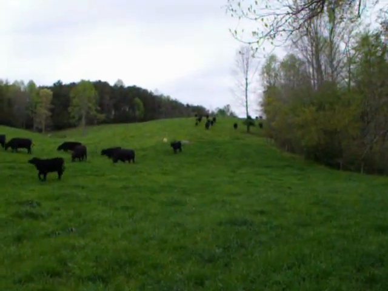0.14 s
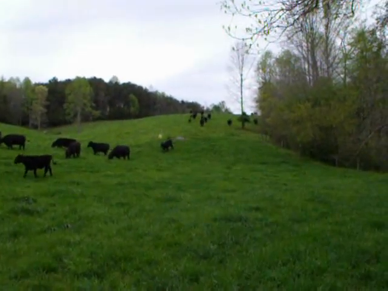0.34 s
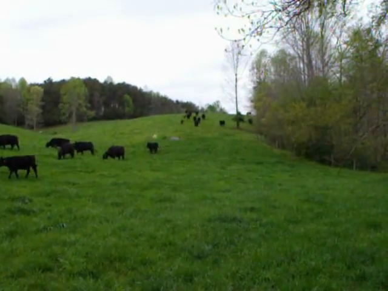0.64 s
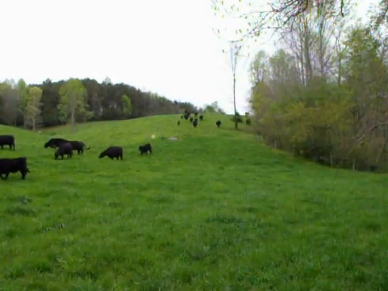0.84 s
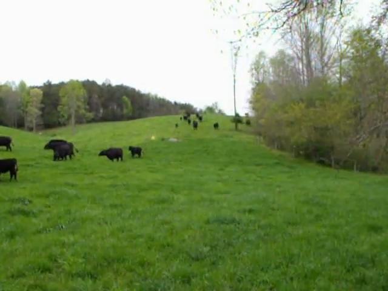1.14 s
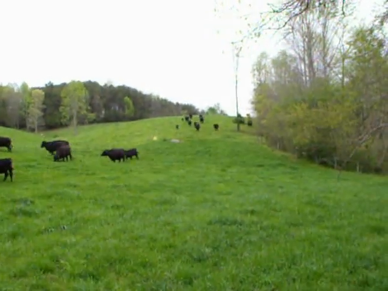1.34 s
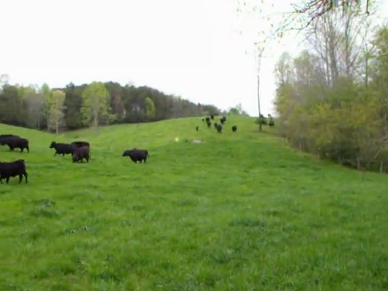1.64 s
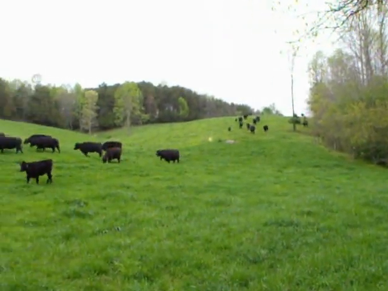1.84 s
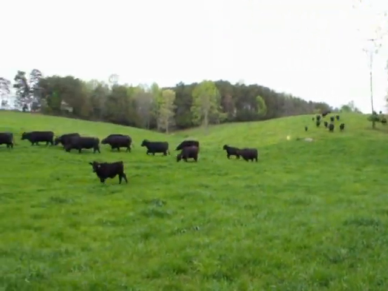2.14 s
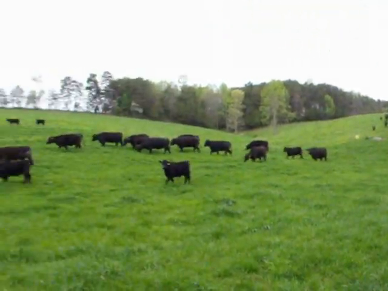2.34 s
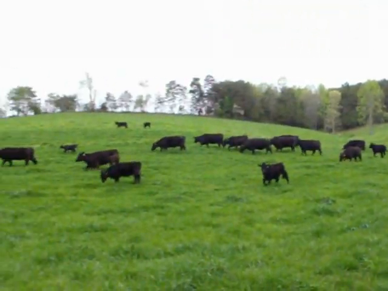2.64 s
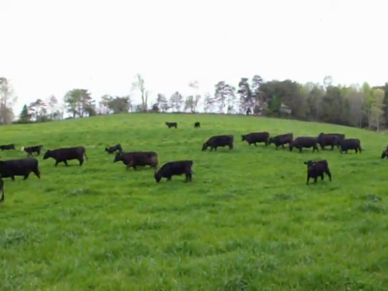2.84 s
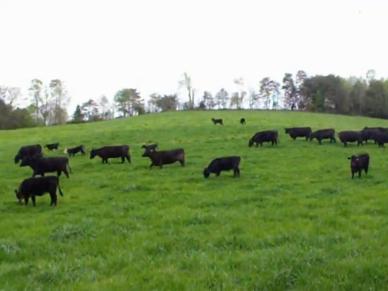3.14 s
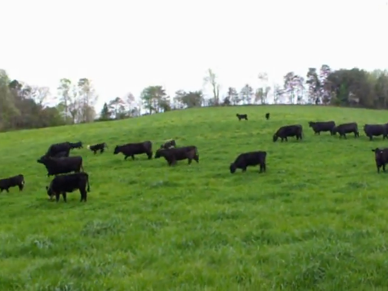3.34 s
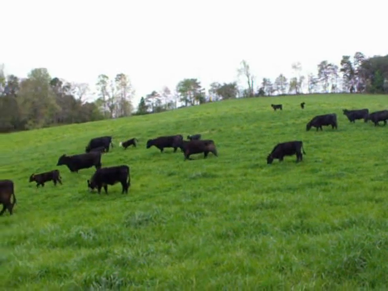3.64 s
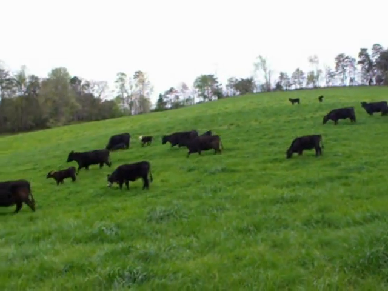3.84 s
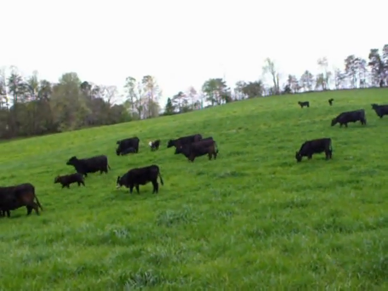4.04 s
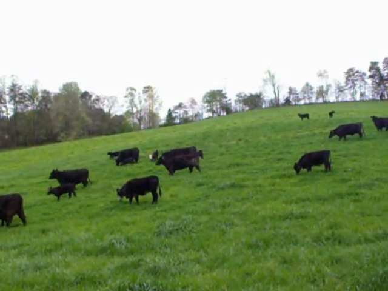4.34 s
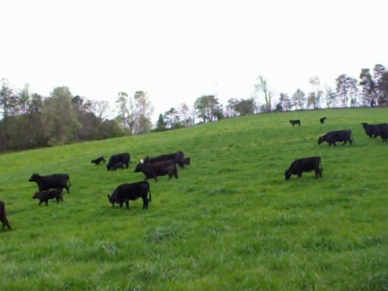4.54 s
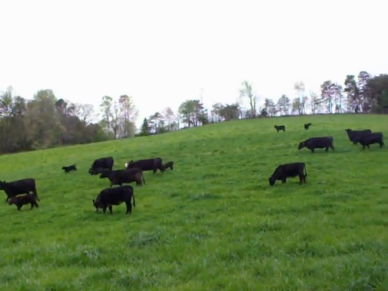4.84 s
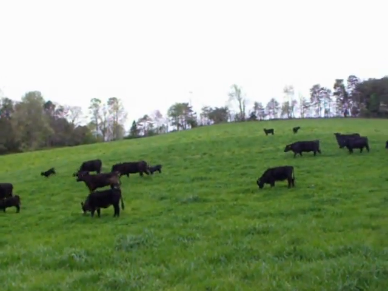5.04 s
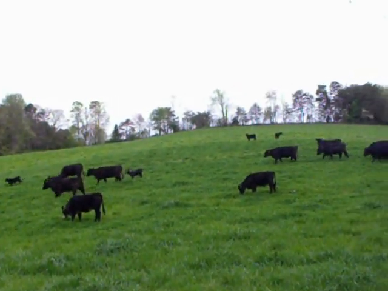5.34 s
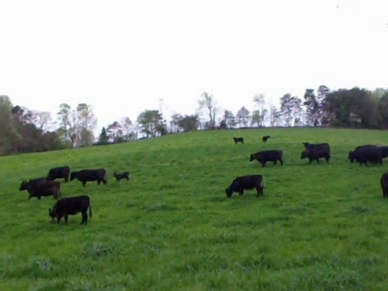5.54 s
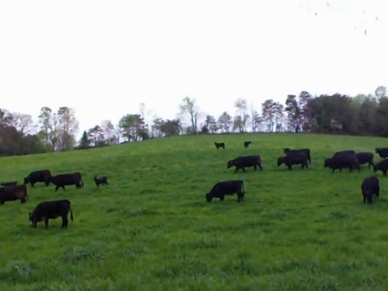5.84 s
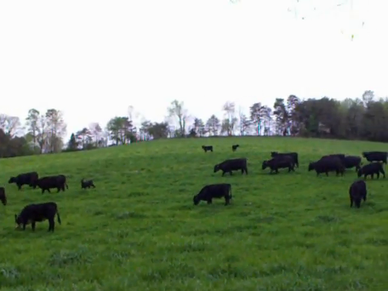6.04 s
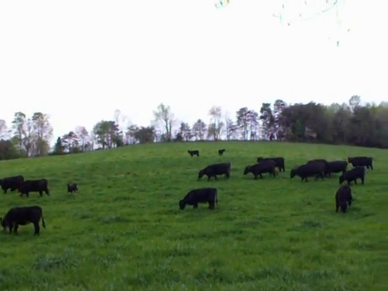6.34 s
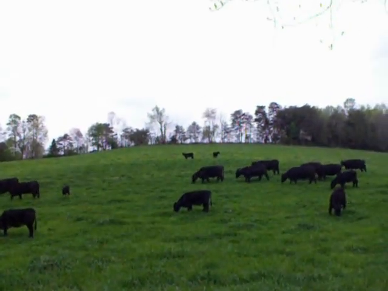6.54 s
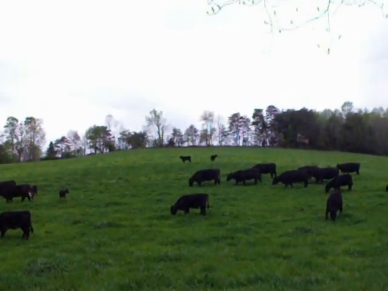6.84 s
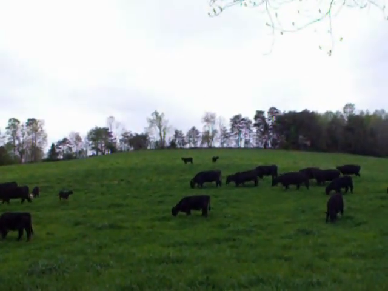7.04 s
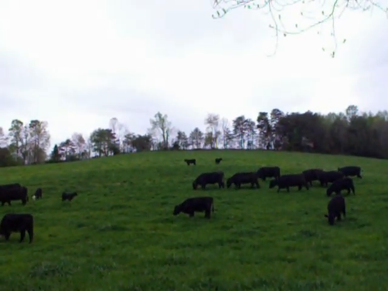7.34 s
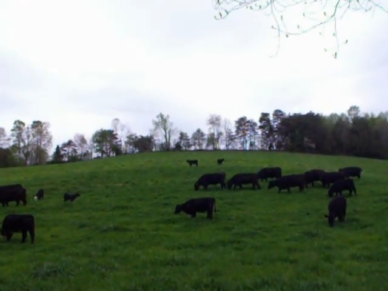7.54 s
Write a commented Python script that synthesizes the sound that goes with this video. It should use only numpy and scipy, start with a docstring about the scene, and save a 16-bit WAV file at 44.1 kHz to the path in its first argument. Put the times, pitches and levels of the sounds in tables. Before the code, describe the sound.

A nearby cow gives short, brassy, wavering moos and another answers with longer rising calls, over wind in the grass.

```python
"""Cattle calling across a pasture

A near cow gives four short brassy moos; a second answers with two long rising calls and ends the
first in a hoarse rasp. Others call far away, two of them very deep. Each voice is a train of
vocal-fold snaps ringing a throat and mouth that change shape. Wind hisses in the grass and trees,
and a hand-held camera ticks, whines and buzzes faintly."""
import sys
import numpy as np
from scipy import signal
from scipy.fft import rfft, irfft, next_fast_len
from scipy.io import wavfile
from scipy.ndimage import map_coordinates

SR = 44100
rng = np.random.default_rng(int(sys.argv[2]) if len(sys.argv) > 2 else 0)


def output_pcm(signal):
    """Save a mono or channel-first signal as 16-bit PCM at the path in sys.argv[1].

    Samples are clipped to [-1, 1] before scaling.
    """
    pcm = np.clip(np.atleast_2d(signal).T, -1, 1) * 32767
    wavfile.write(sys.argv[1], SR, np.round(pcm).astype(np.int16))


N = 339129
TIME = np.arange(N) / SR
CLEAR, HUSKY = .15, .23  # voice roughness: breath and timing jitter

# Wavering moos, four near and one answering: start_s, length_s, attack_s, release_s, level_db, pitch_hz,
# climb_hz_per_s, scoop_hz, catch_s, waver_hz, waver_period_s, mouth_start_hz, mouth_end_hz, gape_hz
WAVERING_MOOS = [(1.478, 0.27, .13, .08, -19.5, 139.3, -8, 0, 1.575, 4, .165, 1350, 1370, 190),
                 (2.215, .455, 0.15, .07, -19.5, 132.7, 0, 10, 2.545, 4.5, .136, 1226, 1423, 170),
                 (3.268, .385, 0.088, .11, -18.5, 129.5, 11, 5, 3.489, 5, .22, 1360, 1580, 279.5),
                 (7.388, .5, 0.27, .06, -16.5, 135, 21, 11.5, 7.51, 1.1, .11, 1418, 1375, -6),
                 (3.25, .535, .2, .16, -26, 137.7, -3, 1, 3.515, 1.7, .16, 1250, 950, -2)]
# Plain lows, a nasal hum, a thin call and two deep ones:
# start_s, length_s, attack_s, release_s, level_db, start_hz, top_hz, end_hz
PLAIN_LOWS = [(2.83, .53, .44, .07, -30.5, 102, 136, 138), (5.68, .43, .1, .22, -38, 142.5, 141.5, 137),
              (3.07, .56, .22, 0.24, -43.5, 87, 101, 84), (5.47, 1.22, .44, .42, -45.5, 65, 84.8, 82)]


def amp(db):
    """Decibels to gain."""
    return 10 ** (np.asarray(db) / 20)


def unit(x):
    """x at rms 1."""
    return x / np.sqrt(np.mean(x ** 2) + 1e-20)


def along(points, hz):
    """Read (freq_hz, value) points on a log axis."""
    f, values = np.transpose(points)
    return np.interp(np.log(hz + 1), np.log(f + 1), values)


def curves(rows, t):
    """Each column after the time, read at the times t."""
    times, *columns = np.transpose(rows)
    return [np.interp(t, times, column) for column in columns]


def bump(t, centre_s, half_length_s):
    """A smooth rise and fall."""
    return np.exp(-((t - centre_s) / half_length_s) ** 2)


def wobble(rate):
    """A smooth random curve, rate knots a second."""
    return map_coordinates(rng.standard_normal(int(N * rate / SR) + 4), [TIME * rate])


def filtered(x, response):
    """x through a frequency response."""
    size = next_fast_len(len(x) + 8192)
    return irfft(rfft(x, size) * response(np.fft.rfftfreq(size, 1 / SR)), size)[:len(x)]


def noise(spectrum):
    """Coloured noise of rms 1."""
    return unit(filtered(rng.standard_normal(N), lambda f: amp(along(spectrum, f))))


def resonance(f, hz, width):
    """Response of one damped mode."""
    return 1j * f * width / (hz * hz - f * f + 1j * f * width)


def causal(gain_db, size):
    """Minimum-phase responses: each rings after its pulse, not before."""
    cepstrum = irfft(np.log(amp(gain_db)))
    cepstrum[:, 1:size // 2] *= 2
    cepstrum[:, size // 2 + 1:] = 0
    return np.exp(rfft(cepstrum))


def wind():
    """A bed of air and rumble, with leaves and grass that hiss in the gusts, then ease."""
    # Colour of the air and of the leaves: freq_hz, relative_db
    air_spectrum = [(12, -28.5), (20, 7), (22, 5), (210, 0), (351, -5), (935, -1.5), (1260, -3.5),
                    (1490, -2.5), (4950, -12), (6170, -17), (6970, -50.5), (9060, -75), (15300, -120)]
    leaf_spectrum = [(180, -29.5), (300, -10), (457, -7.5), (564, -8.5), (849, -5.5), (4820, -1.5),
                     (5950, -12), (6970, -37.5), (9060, -71.5), (15300, -120)]
    # Gusts in the leaves: centre_s, half_length_s, strength
    gusts = [(0.756, 0.055, 1.8), (1.28, 0.15, 1.6), (1.81, .05, 1.6), (2.13, 0.079, 2)]
    breeze_db = np.interp(TIME, [3.27, 6.77], [-36.06, -42.64])
    gust_db = 1.88 * sum(strength * bump(TIME, s, half_length) for s, half_length, strength in gusts)
    bed = noise(air_spectrum) * amp(-41 + 1.2 * wobble(5))
    leaves = noise(leaf_spectrum) * amp(breeze_db + gust_db + 2.07 * wobble(22))
    rumble = noise([(15, -1.5), (60, -15.5), (200, -22.5), (2000, -92)]) * amp(-59.5 + 1.7 * wobble(7.7))
    return bed + leaves + rumble


def handling_ticks():
    """Clicks and soft bumps of a hand on the camera body: a sharp kick, then a short rattle."""
    # Touches: start_s, relative_db, centre_hz, t60_s
    touches = [(0.434, -30.5, 650, .04), (2.6335, -21, 4000, .008), (2.676, -13.5, 2900, 0.02),
               (2.6875, -20.5, 3300, .008), (5.608, -26, 500, 0.26), (5.722, -27, 450, 0.14)]
    out, t = np.zeros(N), np.arange(SR // 10) / SR
    for start, db, hz, t60 in touches:
        rattle = rng.standard_normal(len(t)) * amp(-60 * t / t60)
        rattle[0] += 10  # the kick
        tick = filtered(rattle, lambda f: resonance(f, hz, 2 * hz) ** 2 / (1 + (f / 5500) ** 8))
        out[round(start * SR):][:len(t)] += tick * np.sqrt(SR / hz / 4) * amp(db - 3)
    return out


def tree_line_echo(x, t60_s=0.59):
    """The tree line sends back a dull, diffuse echo."""
    t = np.arange(SR) / SR
    scatter = rng.standard_normal(SR) * amp(-60 * t / t60_s) * (1 - np.exp(-t / 0.0068))
    tail = filtered(scatter, lambda f: 1 / (1 + (f / 2500) ** 2))
    return signal.fftconvolve(x, tail / np.linalg.norm(tail))[:N]


def envelope(start, length, attack, release):
    """Times of one call, the progress 0-1 of its attack and release, and its swell in dB."""
    t = np.linspace(start, start + length, num=200)
    rise = np.clip((t - start) / attack, 0, 1)
    fall = np.clip(1 - (t[-1] - t) / release, 0, 1)
    swell = np.sin(np.pi / 2 * rise) * np.cos(np.pi / 2 * fall)
    return t, rise, fall, 20 * np.log10(np.maximum(swell, .03))


def lowing(start, length, attack, release, db, from_hz, top_hz, to_hz, mouth_hz=1364):
    """Course of a plain low: the mouth stays nearly shut, the pitch glides as it swells and fades."""
    t, rise, fall, swell_db = envelope(start, length, attack, release)
    glide_in = (from_hz - top_hz) * np.cos(np.pi / 2 * rise) ** 2
    glide_out = (to_hz - top_hz) * np.sin(np.pi / 2 * fall) ** 2
    return np.column_stack([t, top_hz + glide_in + glide_out, db + swell_db, np.full_like(t, mouth_hz)])


def wavering(start, length, attack, release, db, hz, climb, scoop_hz, catch, waver_hz, period,
             mouth_from_hz, mouth_to_hz, gape_hz):
    """Course of a moo: it scoops up, wavers around a catch, then drops as the air runs out."""
    scoop_s, drop_hz, push_db_per_hz = .09, 24.96, .41  # a higher pitch is a harder push
    t, _, fall, swell_db = envelope(start, length, attack, release)
    age = t - start
    waver = -waver_hz * np.cos(2 * np.pi * (t - catch) / period) * bump(t, catch, 1.3 * period)
    pitch = hz + climb * age - scoop_hz * np.exp(-age / scoop_s) + waver - drop_hz * fall ** 2
    gape = gape_hz * bump(t, catch - .016, .034)  # the mouth gapes just before the catch
    mouth = mouth_from_hz + (mouth_to_hz - mouth_from_hz) * age / length + gape
    return np.column_stack([t, pitch, db + swell_db + push_db_per_hz * waver, mouth])


def moo(course, throat, rough, mouth_db=0, mouth_width_hz=200, jaw_db=0, bright_db=0, effort=0.48,
        open_db=0, stretch=0, size=2048):
    """Each snap of the vocal folds, with its puff of air, rings the throat as it is shaped just then."""
    start, end = course[0][0], course[-1][0]
    t = TIME[(TIME >= start) & (TIME <= end)]
    cycles = np.cumsum(curves(course, t)[0]) / SR
    snaps = np.interp(np.arange(int(cycles[-1]) + 1), cycles, t)
    # the folds lose their regular beat as the call runs out
    ends_in_scene = end < TIME[-1] - .05
    loose = rough * (1 + 2.8 * np.exp((snaps - end) / .04) * ends_in_scene)
    snaps = snaps + 4e-5 * loose * rng.standard_normal(len(snaps))
    pitch, db, mouth_hz = [curve[:, None] for curve in curves(course, snaps)]
    f, age = np.fft.rfftfreq(size, 1 / SR), np.arange(size) / SR
    # a dropping jaw raises the mouth resonance, shifts the others and brings out a second one above it
    opening = np.clip((mouth_hz - 1300) / 100, 0, 1)
    shape_db = along(throat, f / (1 + stretch * opening))
    shape_db += mouth_db * abs(resonance(f, mouth_hz, mouth_width_hz))
    shape_db += jaw_db * opening * abs(resonance(f, 1748, 220)) ** 2
    # a harder push and a wider mouth both let out more treble
    treble_db = bright_db + effort * (db - db.max()) + open_db * np.log2(mouth_hz / np.median(mouth_hz))
    shape_db += treble_db * np.clip(f / 1500 - 1, 0, 1)
    # tongue and lips never hold still, so the colour drifts
    drift_grid = np.broadcast_arrays((snaps[:, None] - start) * 12 + 1, f / 450)
    shape_db += 1.8 * map_coordinates(rng.standard_normal((24, 64)), drift_grid, mode="nearest")
    puff = rng.standard_normal((len(snaps), size)) * np.exp(-age * pitch)
    breath = rfft(puff / np.linalg.norm(puff, axis=1, keepdims=True)) * (.7 + f / 6000)
    excitation = loose[:, None] * breath - 1  # the -1 is the snap
    onset, fraction = np.divmod(snaps[:, None] * SR, 1)
    subsample_delay = np.exp(-2j * np.pi * f * fraction / SR)
    pulses = irfft(causal(shape_db, size) * excitation * subsample_delay)
    pulses *= np.sqrt(SR / pitch) / np.linalg.norm(pulses, axis=1, keepdims=True)
    pulses *= amp(db + .5 * rng.standard_normal(db.shape))
    return np.bincount((onset.astype(int) + np.arange(size)).ravel(), pulses.ravel(), N)[:N]


def far_cows():
    """A thin distant low and two very deep ones."""
    # Throat colours: freq_hz, relative_db
    thin_throat = [(140, -25), (430, -6), (700, -13), (1100, -3), (1700, 3.5), (2200, -11), (4000, -47)]
    deep_throat = [(85, 1), (170, -6), (260, -17), (1000, -34), (3000, -52.5)]
    thin, deep, deeper = [lowing(*row) for row in PLAIN_LOWS[1:]]
    return moo(thin, thin_throat, CLEAR) + moo(deep, deep_throat, HUSKY) + moo(deeper, deep_throat, CLEAR)


def rasp():
    """The answering cow's slack folds flutter in rushing air, which whistles just before it stops."""
    # Throat resonances: centre_hz, width_hz, relative_db
    modes = [(1015, 190, -2.5), (1424, 170, -9), (2040, 380, -6), (2900, 380, -5.5), (4460, 1300, -12.5)]
    # Pushes of air: centre_s, half_length_s, level_db
    pushes = [(3.66, 0.063, -31.5), (3.795, 0.042, -29.5), (3.902, 0.035, -21.5)]
    # Whistles: start_s, length_s, start_hz, end_hz, level_db
    whistles = [(3.908, 0.023, 767, 860, -25), (3.915, 0.027, 1880, 2080, -19.5)]
    air = rng.standard_normal(N)
    air = filtered(air, lambda f: sum(amp(db) * resonance(f, hz, width) for hz, width, db in modes))
    air = filtered(air, lambda f: 1 / (1 + (f / 4500) ** 6))
    push = sum(amp(db) * bump(TIME, s, half_length) for s, half_length, db in pushes)
    flutter = amp(1.7 * wobble(260))
    out = unit(air * flutter) * push
    for start, length, from_hz, to_hz, db in whistles:
        progress = np.clip((TIME - start) / length, 0, 1)
        hz = (from_hz + (to_hz - from_hz) * progress) * (1 + 0.021 * wobble(400))
        swell = amp(db) * np.sqrt(2) * np.sin(np.pi * progress) ** 2
        out += swell * np.sin(2 * np.pi * np.cumsum(hz) / SR)
    return out


def answering_cow():
    """A nasal hum opens into a moo; then a long moo rises and swells as its mouth resonance sinks."""
    # Throat colours, humming and open: freq_hz, relative_db
    hum_throat = [(110, -12), (220, -1), (350, -16), (900, -11), (1400, -4), (2100, -16), (2620, 1),
                  (3000, -18), (3900, -14), (4220, 5), (4550, -13), (6000, -22)]
    open_throat = [(130, -6), (330, -9.5), (430, 0), (580, -14), (850, -9), (1150, 0), (1420, -7),
                   (1650, 7), (1950, -12), (2220, 5.5), (2500, -12.5), (2750, 4), (3200, -17.5),
                   (4400, -7.5), (6000, -29)]
    # Course of the long moo: time_s, pitch_hz, level_db, mouth_hz
    long_moo = [(4.88, 106.4, -40.5, 1230), (5.01, 121.6, -35.5, 1370), (5.104, 118.0, -37.5, 1290),
                (5.188, 126.2, -30.5, 1220), (5.234, 128.5, -30.5, 1183), (5.308, 138.8, -26, 1239),
                (5.468, 137.7, -29, 1117), (5.51, 140.4, -24.5, 1120), (5.568, 144.8, -26, 1140),
                (5.712, 151.1, -23, 1180), (5.734, 149.1, -23, 1083), (5.78, 140, -32, 1090)]
    hum, answer = lowing(*PLAIN_LOWS[0]), wavering(*WAVERING_MOOS[-1])
    return (moo(hum, hum_throat, CLEAR, mouth_db=7.5, mouth_width_hz=110, effort=3.2, bright_db=1)
            + moo(answer, open_throat, CLEAR, mouth_db=17.5, mouth_width_hz=110, bright_db=1.5)
            + moo(long_moo, open_throat, HUSKY, mouth_db=18, mouth_width_hz=130, effort=.65, open_db=51))


def near_cow():
    """Four short brassy moos, the last through a wide-open throat."""
    # Throat colours: freq_hz, relative_db
    throat = [(130, -26.5), (410, -20.5), (530, -1.5), (670, -9.5), (1080, -7.5), (1350, 1.5), (1700, -6),
              (2050, -8), (2330, -7.5), (2520, 12.5), (2760, -9), (3010, 4.5), (3300, -8), (4700, -6),
              (5600, -27)]
    wide_throat = [(130, -28.5), (410, -24), (540, -8.5), (680, -14), (1150, -10), (1360, -1), (1750, -1),
                   (2030, -15.5), (2470, 10), (2790, -12), (3020, 4), (3330, -29), (3720, 0.5),
                   (4120, -16.5), (4650, -2), (5500, -24), (6400, -25)]
    first, second, third, last = [wavering(*row) for row in WAVERING_MOOS[:4]]
    return (moo(first, throat, HUSKY, mouth_db=11.5, mouth_width_hz=90, jaw_db=14.5,
                bright_db=3, open_db=15, stretch=-0.012)
            + moo(second, throat, CLEAR, mouth_db=13, mouth_width_hz=117, jaw_db=16.5,
                  bright_db=-1.5, effort=1.5, open_db=14.5, stretch=0.016)
            + moo(third, throat, HUSKY, mouth_db=11, mouth_width_hz=150, jaw_db=16,
                  bright_db=-2.5, stretch=0.02)
            + moo(last, wide_throat, CLEAR, mouth_db=14.5, mouth_width_hz=73, jaw_db=13, bright_db=-0.5))


def scene():
    """The herd and its faint echo over wind and handling ticks, in mono."""
    herd = near_cow() + answering_cow() + far_cows() + rasp()
    return (herd + amp(-25) * tree_line_echo(herd) + wind() + handling_ticks())[None]


def record(dry):
    """The camera adds a thin whine and a faint buzz, and cuts the high treble steeply."""
    # Whine tones: pitch_hz, level_db
    tones = [(5012, -53), (6013, -64.5)]
    buzz_hz, cutoff_hz = 60, 6900
    whine = sum(amp(db) * np.sqrt(2) * np.sin(2 * np.pi * hz * TIME + 0.28 * wobble(9.6))
                for hz, db in tones)
    pulsing = np.exp(-(TIME * buzz_hz % 1) / 0.44)
    buzz = amp(-42.5) * unit(noise([(300, -6.5), (2000, -4), (5000, -2), (6500, -25.5)]) * pulsing)
    mix = dry[0] + whine + buzz
    return filtered(mix, lambda f: 1 / (1 + (f / cutoff_hz) ** 36) ** 2 * (f < cutoff_hz + 400))[None]


dry = scene()
out = record(dry)
output_pcm(out)
```